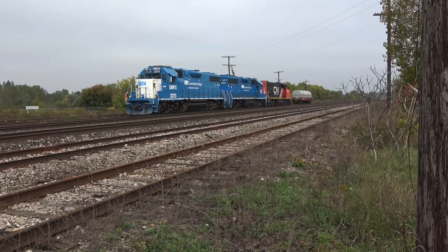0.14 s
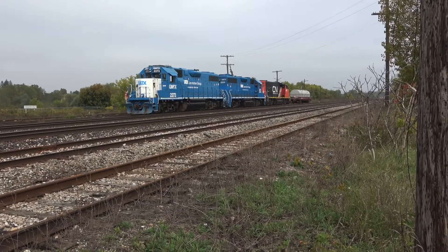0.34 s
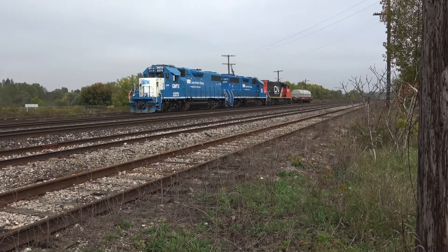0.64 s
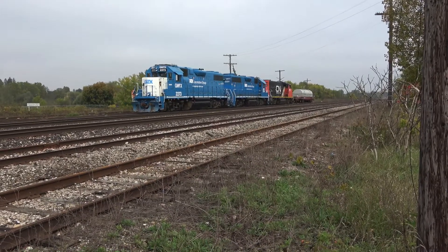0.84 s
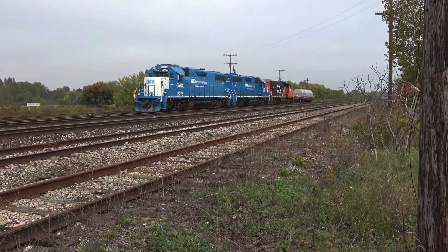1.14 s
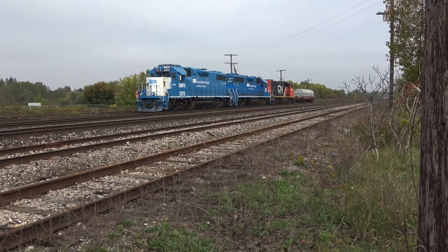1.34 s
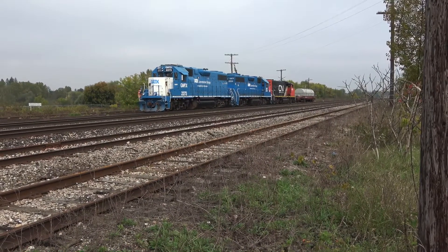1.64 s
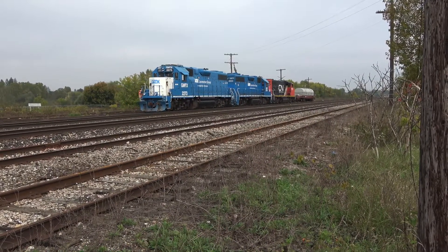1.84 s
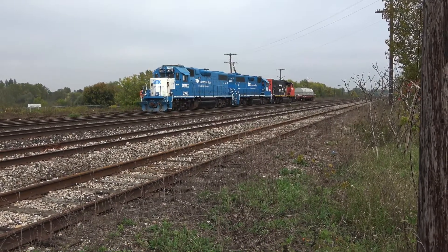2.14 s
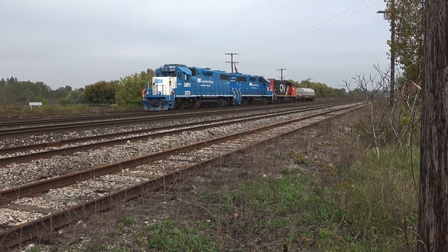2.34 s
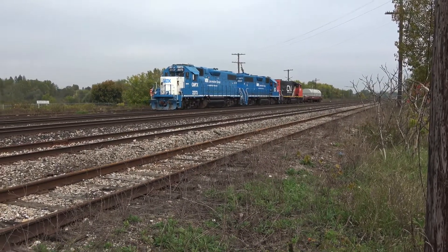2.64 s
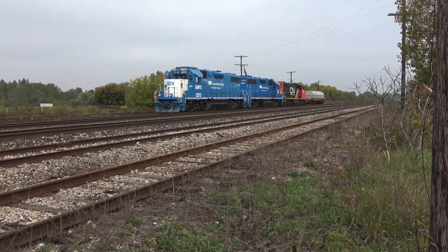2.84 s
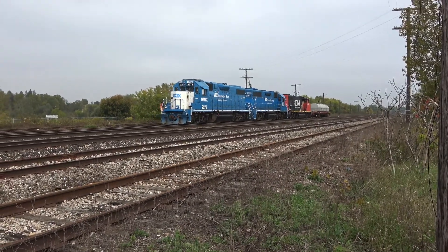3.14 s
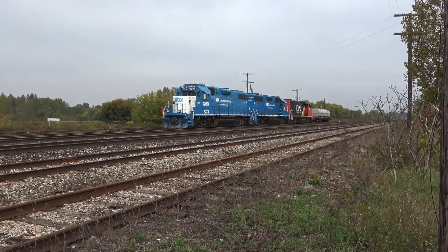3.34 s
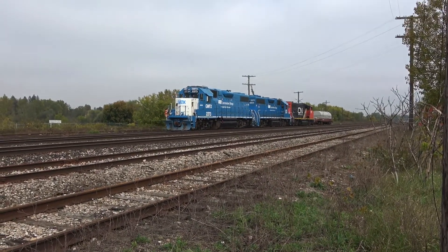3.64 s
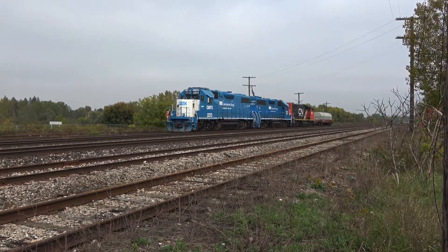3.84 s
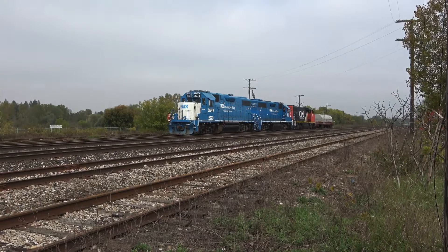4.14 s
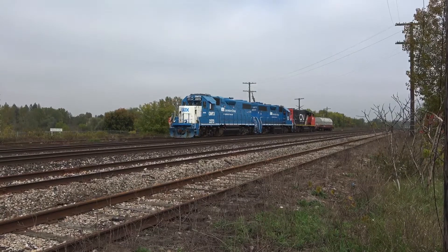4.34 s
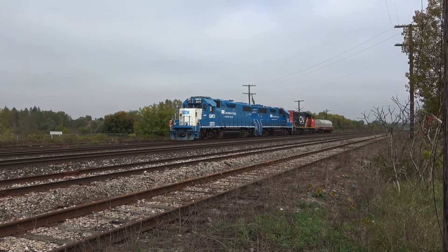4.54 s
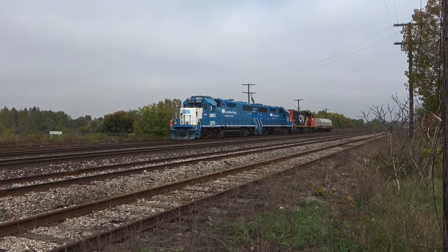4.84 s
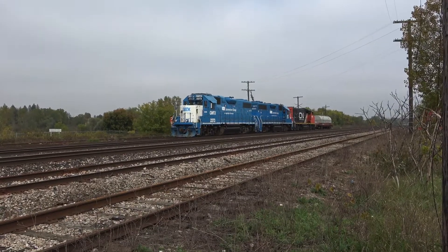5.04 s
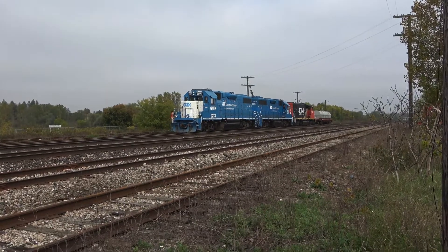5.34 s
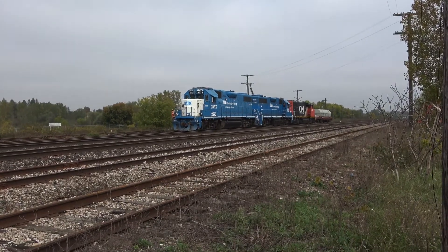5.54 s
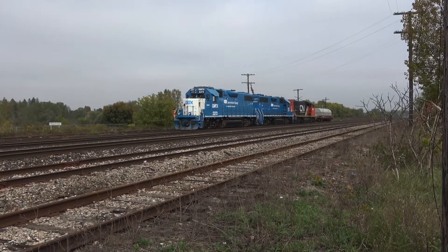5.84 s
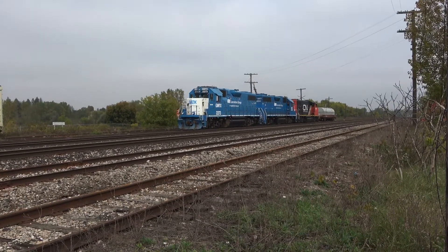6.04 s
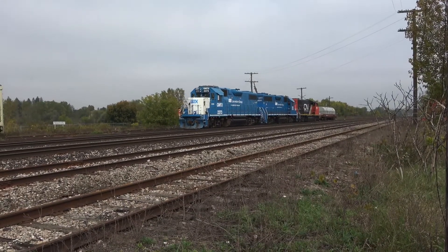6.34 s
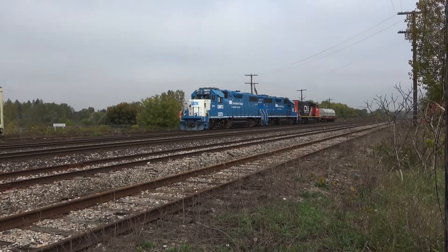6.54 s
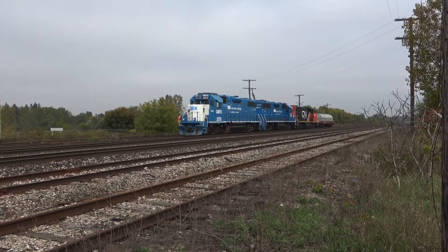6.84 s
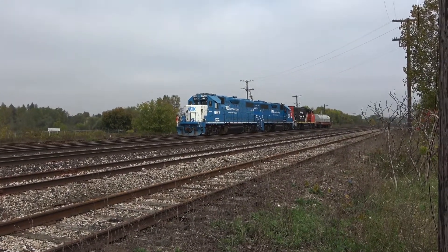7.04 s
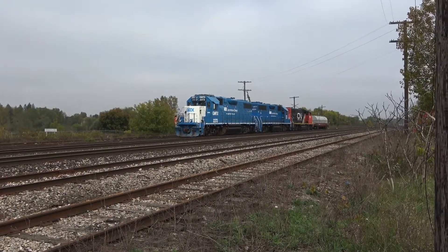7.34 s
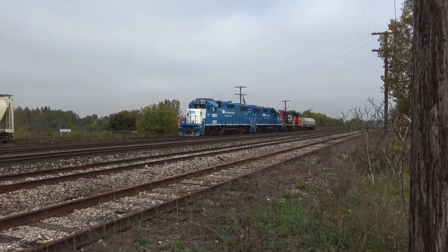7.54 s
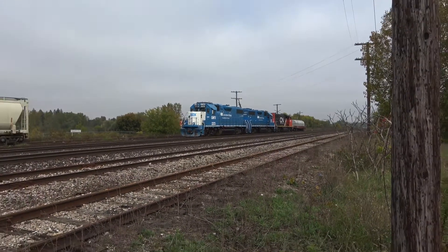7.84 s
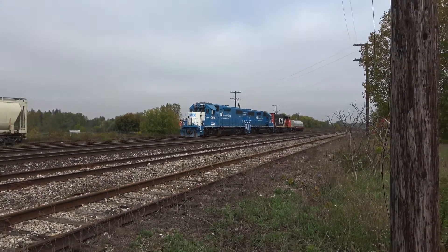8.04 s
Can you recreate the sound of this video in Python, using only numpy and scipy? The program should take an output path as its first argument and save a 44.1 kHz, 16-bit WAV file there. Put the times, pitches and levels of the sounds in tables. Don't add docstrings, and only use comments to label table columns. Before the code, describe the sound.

Coupled diesel locomotives idle with a steady, throbbing drone, whining blowers and rhythmic air puffs across the tracks, while crickets trill in nearby grass.

```python
import sys
import numpy as np
from scipy import signal
from scipy.fft import rfft, irfft, next_fast_len
from scipy.io import wavfile
from scipy.ndimage import map_coordinates

SR = 44100
rng = np.random.default_rng(int(sys.argv[2]) if len(sys.argv) > 2 else 0)


def persist_wave(psi):
    counts = np.round(np.clip(psi, -1, 1) * 32767).astype(np.int16)
    wavfile.write(sys.argv[1], SR, np.atleast_2d(counts).T)


def invert_db(level):
    return 10 ** (np.asarray(level, dtype=float) / 20)


N = 361619

# (time [s], lead engine [turns/s], second engine [turns/s])
CRANK_SPEED = [(0.0, 5.165, 4.974), (1.64, 5.168, 4.977), (2.46, 5.169, 4.982), (4.92, 5.173, 4.982),
               (6.56, 5.168, 4.98), (7.38, 5.15, 4.952), (8.2, 5.145, 4.941)]
# (multiple of turn rate [-], level [dB rms])
LEAD_EXHAUST = [(8, -49), (9, -48), (19, -52), (22, -49), (23, -49), (24, -45), (26, -50), (30, -46),
                (31, -43), (32, -36), (33, -39), (34, -38), (35, -42), (36, -46)]
SECOND_EXHAUST = [(8, -48), (9, -52), (11, -51), (13, -52), (24, -48), (25, -48), (27, -50), (32, -43),
                  (33, -46), (34, -46), (35, -44), (36, -40), (37, -49), (40, -48)]
# (multiple of turn rate [-], level [dB rms])
LEAD_GEARS = [(77, -56.5), (79, -53), (99, -58), (106, -62), (126, -59.5), (142, -52.5), (158, -50.5),
              (316, -59)]
SECOND_GEARS = [(82, -51), (105, -58.5), (120, -58), (132, -51.5)]
# (frequency [Hz], level [dB rms per multiple])
UNEVEN_FIRING_TONES = [(30, -66), (60, -59.5), (85, -60), (112, -55.5), (141, -60.5), (152, -50.5),
                       (190, -53), (230, -63.5)]
# (frequency [Hz], level [dB rms per multiple])
VALVE_CLATTER = [(230, -60.5), (320, -64.5), (400, -60), (470, -68.5), (560, -67.5), (680, -62),
                 (800, -60.5), (900, -72), (1200, -68.5), (1500, -78.5), (2100, -75), (2600, -88.5)]
# (multiple of firing rate [-], level [dB rms])
FAR_FIRING = [(1, -63), (2, -62), (4, -48), (5, -54), (6, -48.5), (7, -58)]
# (time [s], level [dB])
FAN_LEVEL = [(0.0, -44), (0.66, -47), (1.74, -48.5), (2.69, -49.5), (3.56, -48.5), (4.34, -49.5),
             (5.39, -50.5), (6.3, -49.5), (7.65, -50), (8.2, -49.5)]
# (frequency [Hz], level [dB per Hz])
BODY_COLOUR = [(20, -30), (32, -21), (43, -8), (58, -16), (90, -17.5), (120, -17), (140, -15), (172, -7),
               (205, -11.5), (300, -21.5), (650, -12.5), (950, -22), (1500, -26.5), (2100, -25.5),
               (3200, -33.5), (4500, -76)]
# (frequency [Hz], level [dB per Hz])
FAN_COLOUR = [(1290, -37), (2200, -7), (2370, -2.5), (2580, -7.5), (3000, -5.5), (3630, -6), (6540, -12),
              (7710, -18), (10000, -29.5), (13000, -58), (22000, -120)]
# (frequency [Hz], level [dB per Hz])
LEAK_COLOUR = [(5000, -11.5), (7000, -7), (8500, 0.5), (9500, -10), (11000, -7.5), (13000, -18.5),
               (14500, -24), (16500, -24)]
# (frequency [Hz], level [dB per Hz])
PUFF_SPECTRUM = [(2000, -25), (3500, -3.5), (5500, 4), (8000, -2), (11000, -11.5), (14000, -19),
                 (16000, -26)]
# (time [s], level [dB])
LEAK_FACING = [(0, -41.5), (.25, -51), (1.2, -51), (1.8, -53), (2.2, -48.5), (2.6, -51), (3.5, -45),
               (4.3, -53), (4.7, -52.5), (6.0, -55), (6.8, -52), (7.8, -53), (8.16, -47.5)]
# (start [s], end [s], pitch [Hz], half width [Hz], level [dB])
AIR_OPENINGS = [
    (1, 1.9, 1500, 88, -53.5),
    (2.5, 4.0, 2010, 94, -50),
    (7, 8.4, 2000, 88, -53.5),
    (4.5, 6.5, 3005, 29, -58.5),
]
# (time [s], lag [ms], strength [0-1])
GROUND_ECHO = [(0, 1.56, .25), (2.5, 1.56, .3), (2.9, 1.48, .5), (3.4, 1.43, .58), (3.9, 1.46, .55),
               (4.2, 1.57, .45), (5.5, 1.59, .45), (7, 1.76, .35), (8.2, 1.74, .3)]
# (frequency [Hz], left minus right [dB])
TRAIN_LEAN = [(35, -1), (70, -2.5), (150, -0.26), (250, 0.86), (345, -4), (430, -5), (560, -3.5), (860, -5),
              (1200, -3), (1500, -3), (1940, -2), (2600, -1.5), (4300, -0.5), (8000, -0.5), (15000, 0.5)]
# (time [s], peak level [dB], lowest pitch [Hz])
GRASS_TICKS = [(.002, -40, 4000), (.021, -37, 4000), (.03, -42, 4000), (.068, -45, 5000), (.107, -50, 5000),
               (.138, -48, 6000), (.147, -47, 6000), (.167, -48, 6000), (.19, -52, 6000), (.387, -49, 7000),
               (2.4384, -47, 11000), (2.4443, -36, 9000), (2.4894, -48, 12140), (2.8404, -51, 8500),
               (3.0879, -51, 7000)]
# (time [s], level [dB])
GRASSHOPPER = [
    (.027, -51),
    (.07, -53),
    (3.632, -54),
    (3.77, -58),
    (3.812, -56),
    (3.928, -54),
    (3.972, -58),
    (4.008, -57),
    (4.045, -62),
    (4.08, -57),
]
# (first chirp [s], next phrase [s], chirps [count])
NEAR_CRICKET = [
    (.208, 3.452, 55),
    (3.452, 4.226, 13),
    (4.25, 5.237, 17),
    (5.237, 5.885, 11),
    (5.885, 7.393, 26),
    (7.393, 8.245, 14),
]
RIGHT_CRICKET = [
    (.755, 2.317, 28),
    (2.77, 5.214, 45),
    (5.404, 5.554, 3),
    (5.554, 6.744, 22),
]
SLOW_CRICKET = [
    (6.71, 8.19, 12),
]
# (rate [chirps/s], pitch [Hz], level [dB], left minus right [dB])
DISTANT_CRICKETS = [(16.3, 7350, -59, -7), (17.6, 7800, -59, -8), (15.4, 8000, -58, -8),
                    (18.9, 7600, -63, 5), (16.8, 8200, -61, -7), (17.9, 7300, -64, 4)]

FAN_MEAN_DB = -49
BLOWER_GEARING = 237


def rms_one(x):
    return x / np.sqrt(np.mean(x ** 2) + 1e-20)


def in_time(rows):
    s, *columns = np.transpose(rows)
    return [np.interp(np.arange(N) / SR, s, column) for column in columns]


def at_hz(points, hz):
    table_hz, db = np.array(points).T
    return np.interp(np.log(hz + 1), np.log(table_hz), db)


def coloured(x, points):
    size = next_fast_len(N)
    gain = invert_db(at_hz(points, np.fft.rfftfreq(size, 1 / SR)))
    return irfft(rfft(x, size) * gain, size)[..., :N]


def filtered(x, order, hz, kind):
    return signal.sosfilt(signal.butter(order, hz, kind, fs=SR, output="sos"), x)


def drift(rate):
    knots = rng.standard_normal(400)
    return map_coordinates(knots, [np.arange(N) / SR * rate * 2], order=1)


def hiss(points, flutter_db):
    return rms_one(coloured(rng.standard_normal(N), points) * invert_db(flutter_db * drift(12)))


def sides(x, lean_db, lag):
    return np.array([np.roll(x, lag) * invert_db(lean_db / 2), x * invert_db(-lean_db / 2)])


def cricket(phrases, hz, arch_hz, length, level_db, uneven_db):
    times = np.concatenate([np.linspace(a, b, n, endpoint=False) for a, b, n in phrases])
    size = int(length * SR)
    u, out = np.linspace(0, 1, size), np.zeros(N + SR)
    for s, (early, pitch, loud) in zip(times, rng.standard_normal((len(times), 3))):
        stroke_hz = hz * (1 + .004 * pitch) - arch_hz * (2 * u - .75) ** 2
        phase = 2 * np.pi * np.cumsum(stroke_hz) / SR
        at = int((s - length / 2 + 0.0011 * early) * SR)
        out[at:at + size] += invert_db(level_db + uneven_db * loud) * np.sin(np.pi * u) * np.sin(phase)
    return out[:N]


def chorus(level_db):
    band = [(6200, -40), (7100, 3), (7600, -6), (8300, -15), (8800, -4), (9600, -32)]
    out = invert_db(level_db) * np.array([.6 * hiss(band, flutter_db=1.2), hiss(band, flutter_db=1.2)])
    starts = rng.random(len(DISTANT_CRICKETS))
    for (rate, hz, db, lean_db), start in zip(DISTANT_CRICKETS, starts):
        phrase = (.02 + start / rate, 8.2, int(8.2 * rate))
        trill = cricket([phrase], hz, arch_hz=250, length=.016, level_db=db, uneven_db=2.5)
        out = out + sides(trill * invert_db(2.5 * drift(0.82)), lean_db, lag=0)
    return out


def ticks():
    out, t = np.zeros(N), np.arange(300) / SR
    for s, peak_db, hz in GRASS_TICKS:
        snap = rng.standard_normal(300) * np.exp(-t / 0.0011)
        at = int(s * SR)
        out[at:at + 300] += invert_db(peak_db) * filtered(snap, 4, hz, "high")
    return out


def rasps():
    t = np.arange(N) / SR
    scrape_s = .007
    strokes = sum(invert_db(db) * np.exp(-((t - s) / scrape_s) ** 2) for s, db in GRASSHOPPER)
    return strokes * rms_one(filtered(rng.standard_normal(N), 3, [6500, 10500], "band"))


def grass():
    near = cricket(NEAR_CRICKET, hz=7600, arch_hz=200, length=.017, level_db=-50, uneven_db=1.0)
    near = near * invert_db(np.linspace(-.5, .8, N))
    right = cricket(RIGHT_CRICKET, hz=8250, arch_hz=250, length=.009, level_db=-51.5, uneven_db=1.5)
    slow = cricket(SLOW_CRICKET, hz=8360, arch_hz=300, length=0.018, level_db=-52.5, uneven_db=2.0)
    out = sides(near, lean_db=-5.5, lag=0) + sides(rasps(), lean_db=-5, lag=0)
    out = out + sides(right, lean_db=-8, lag=1) + sides(slow, lean_db=-7, lag=1)
    return out + sides(ticks(), lean_db=-4.5, lag=0)


def tree_returns(body_db, fan_db, leak_db):
    out = invert_db(body_db - 26) * hiss(BODY_COLOUR, flutter_db=4.0)
    out = out + invert_db(leak_db - 10) * hiss(LEAK_COLOUR, flutter_db=0.0)
    out = out + invert_db(fan_db - 22.5) * hiss(FAN_COLOUR, flutter_db=4.0)
    return out * [[1], [-1]]


def duct(start, end, hz, half_width_hz, db):
    t = np.arange(N) / SR
    breath = filtered(rng.standard_normal((2, N)), 2, half_width_hz, "low")
    tone = breath[0] * np.sin(2 * np.pi * hz * t) + breath[1] * np.cos(2 * np.pi * hz * t)
    away_s = np.maximum(0, np.maximum(start - t, t - end))
    return invert_db(db - 44 * away_s) * rms_one(tone)


def puffs(lead):
    puff_at_turn, jitter_s, uneven_db = .115, .002, .9
    at = np.flatnonzero(np.diff(np.floor(np.cumsum(lead) / SR - puff_at_turn)))
    late, loud = rng.standard_normal((60, 2))[:len(at)].T
    strikes = np.zeros(N)
    strikes[(at + jitter_s * SR * late).astype(int)] = invert_db(in_time(LEAK_FACING)[0][at] + uneven_db * loud)
    t = np.arange(SR // 8) / SR
    shape = (1 - np.exp(-t / 0.0055)) ** 2 * np.exp(-t / 0.019)
    swell = signal.fftconvolve(strikes, shape / shape.max())[:N]
    return swell * hiss(PUFF_SPECTRUM, flutter_db=-0.2)


def far_engine(lead):
    firing = 2 * np.pi * np.cumsum(6.087 * lead) / SR
    out = np.zeros(N)
    for k, db in FAR_FIRING:
        out += invert_db(db + 3 + 1.5 * drift(1)) * np.sin(k * firing + 6 * rng.random())
    return out


def lead_blower(lead):
    idle_turns, db_per_turn, fade_db_per_s = 5.168, 200, 0.48
    db = -40 + db_per_turn * (lead - idle_turns) - fade_db_per_s * np.arange(N) / SR
    hz = BLOWER_GEARING * lead
    return invert_db(db + 2.2 * drift(8)) * np.sin(2 * np.pi * np.cumsum(hz + 1.2 * drift(3)) / SR)


def far_blower(lead):
    hz = BLOWER_GEARING * .957 * lead * (1 + .0006 * drift(.6))
    return invert_db(-56 + 3 + 4 * drift(2.5)) * np.sin(2 * np.pi * np.cumsum(hz) / SR)


def engine(turns, exhaust, whine, wander):
    size, shapes = 8192, 8
    multiple = np.arange(size // 2 + 1)
    hz, low = multiple * turns.mean(), multiple < 46
    db = np.where(low, at_hz(UNEVEN_FIRING_TONES, hz), at_hz(VALVE_CLATTER, hz))
    db = db + 2.77 * rng.standard_normal(len(multiple))
    db[(multiple < 6) | (multiple > 500)] = -200
    loose = np.where(low, wander, .8)
    for table, share in ((exhaust, wander), (whine, .25)):
        at = np.round(np.array(table)[:, 0]).astype(int)
        db[at], loose[at] = np.array(table)[:, 1], share
    chance = rng.standard_normal((2, shapes, len(multiple)))
    sway = (1 + loose * (chance[0] + 1j * chance[1])) / np.sqrt(1 + loose ** 2)
    lines = invert_db(db) * np.exp(2j * np.pi * rng.random(len(multiple))) * sway
    waves = irfft(lines, size) * size / np.sqrt(2)
    crank = np.cumsum(turns) / SR % 1
    closed = np.c_[waves, waves[:, 0]]
    return map_coordinates(closed, [np.linspace(0, shapes - 1, N), crank * size], order=1)


def ground(x, lag_ms, echo):
    late = np.interp(np.arange(N) - lag_ms * SR / 1000, np.arange(N), x)
    size = next_fast_len(N)
    hz = np.fft.rfftfreq(size, 1 / SR)
    kept = hz ** 4 / (hz ** 4 + 400 ** 4) / (1 + (hz / 3600) ** 4)
    return x + echo * irfft(rfft(late, size) * kept, size)[:N]


def scene():
    lead, second = in_time(CRANK_SPEED)
    fan_db, = in_time(FAN_LEVEL)
    lag_ms, echo = in_time(GROUND_ECHO)
    body_db = -35.5 + 0.4 * (fan_db - FAN_MEAN_DB) - 5.5 * (echo - echo.mean())
    leak_db = -60.5 + (fan_db - FAN_MEAN_DB) - 0.35 * np.arange(N) / SR

    engines = engine(lead, LEAD_EXHAUST, LEAD_GEARS, wander=0.13)
    engines = engines + engine(second, SECOND_EXHAUST, SECOND_GEARS, wander=0.25)
    roar = invert_db(body_db) * hiss(BODY_COLOUR, flutter_db=0.63) + invert_db(fan_db) * hiss(FAN_COLOUR, flutter_db=0.75)
    train = ground(engines + roar, lag_ms, np.clip(echo, 0, .95))
    train = train + lead_blower(lead) + far_blower(lead) + far_engine(lead)
    train = train + sum(duct(*row) for row in AIR_OPENINGS) + puffs(lead)
    train = train + invert_db(leak_db) * hiss(LEAK_COLOUR, flutter_db=2.5)

    lean = np.array(TRAIN_LEAN)
    wide = np.array([coloured(train, lean * [1, .5]), coloured(train, lean * [1, -.5])])
    return wide + tree_returns(body_db, fan_db, leak_db) + grass() + chorus(level_db=-62)


def low_pass(x):
    return signal.sosfilt(signal.butter(12, 15720, fs=SR, output="sos"), x)


def record(dry):
    own = filtered(rng.standard_normal((3, N)), 4, 12500, "high")
    heard = dry + invert_db(-74) * (own[0] + .3 * own[1:])
    heard = coloured(heard, [(15150, 0), (15450, -6), (20000, -6)])
    return low_pass(heard)


dry = scene()
out = record(dry)
persist_wave(out)
```